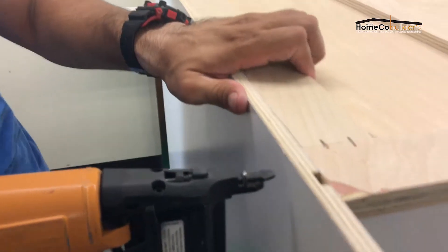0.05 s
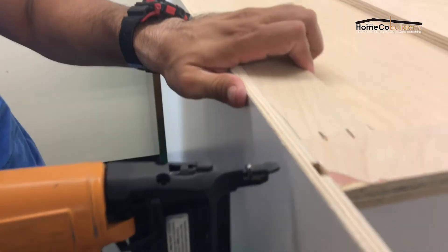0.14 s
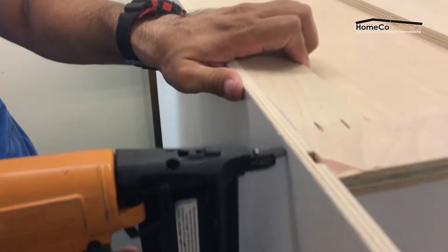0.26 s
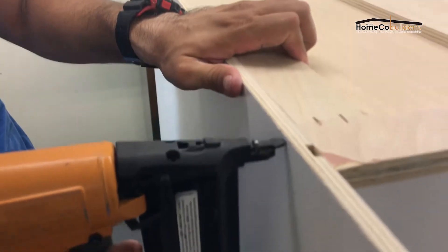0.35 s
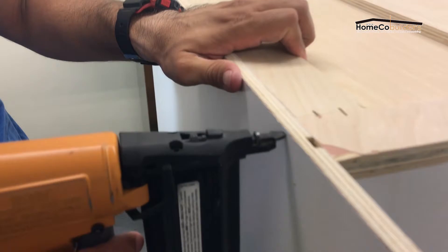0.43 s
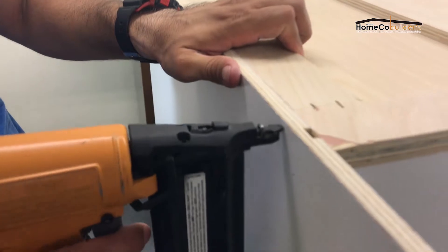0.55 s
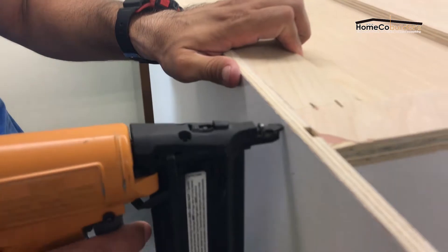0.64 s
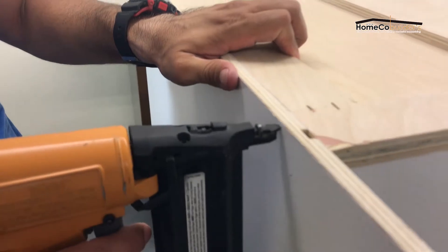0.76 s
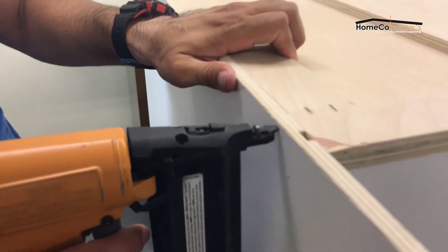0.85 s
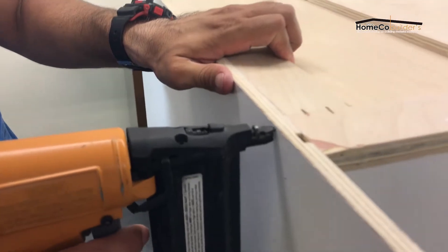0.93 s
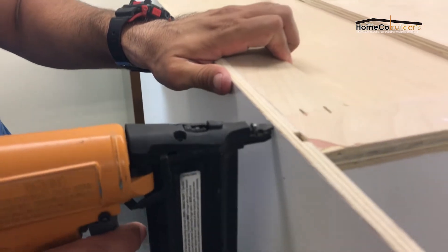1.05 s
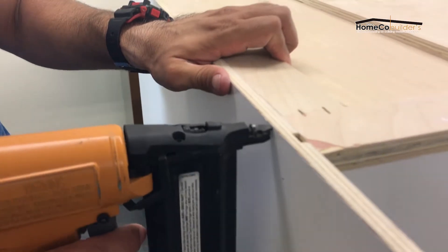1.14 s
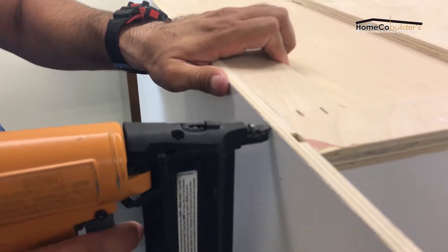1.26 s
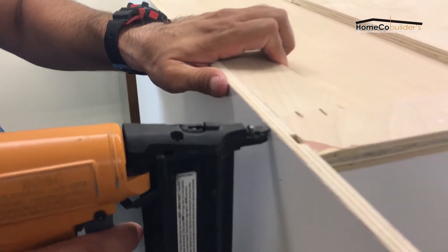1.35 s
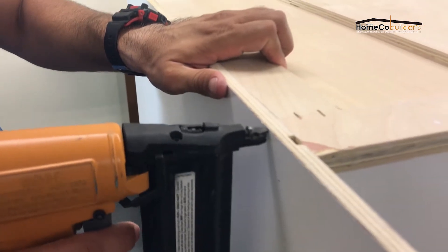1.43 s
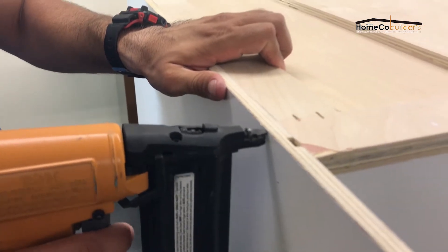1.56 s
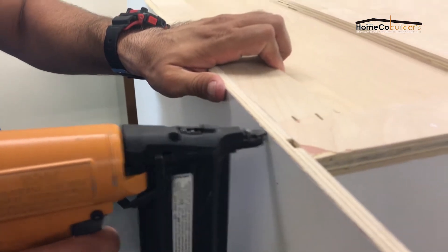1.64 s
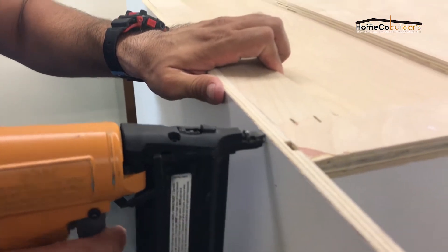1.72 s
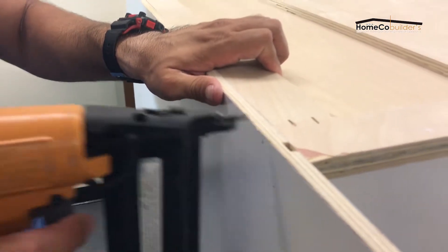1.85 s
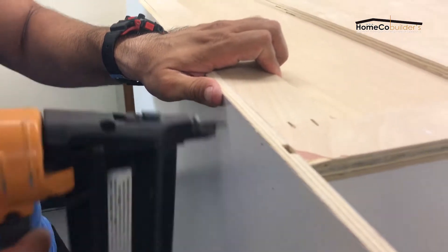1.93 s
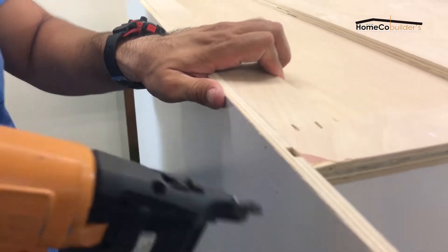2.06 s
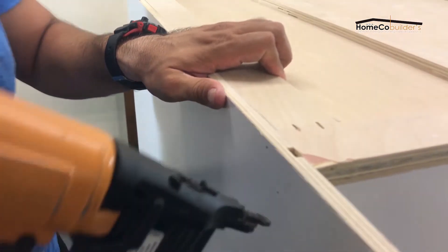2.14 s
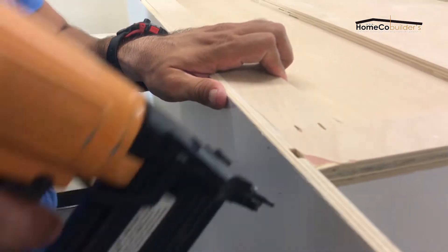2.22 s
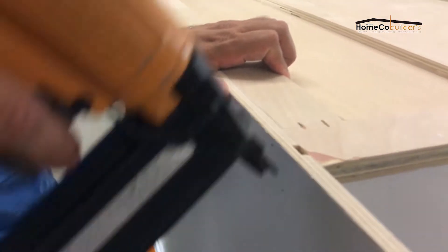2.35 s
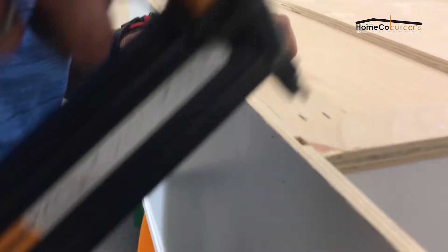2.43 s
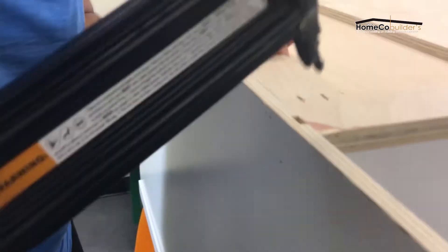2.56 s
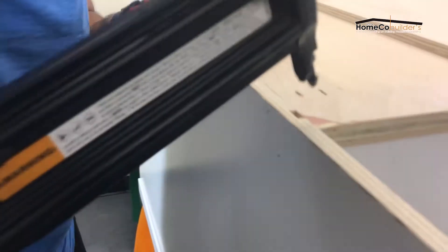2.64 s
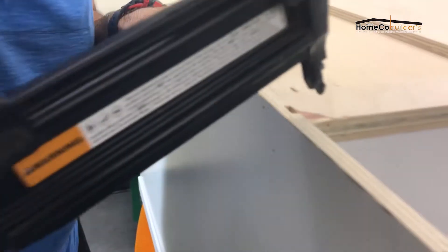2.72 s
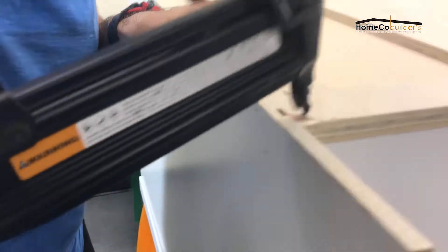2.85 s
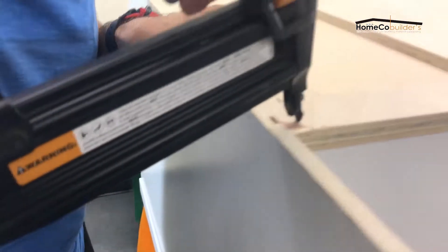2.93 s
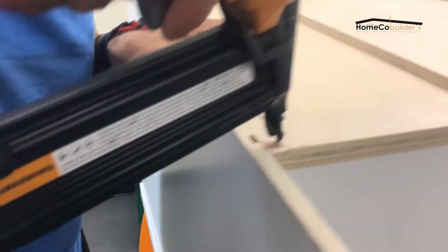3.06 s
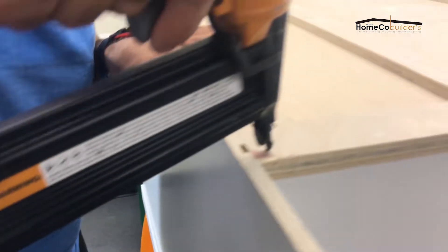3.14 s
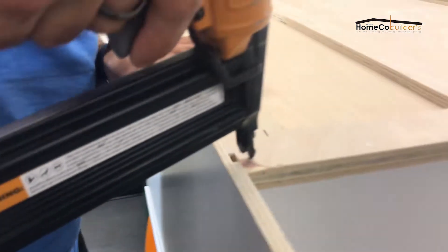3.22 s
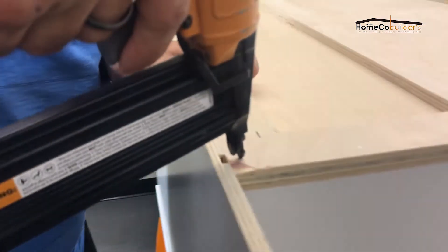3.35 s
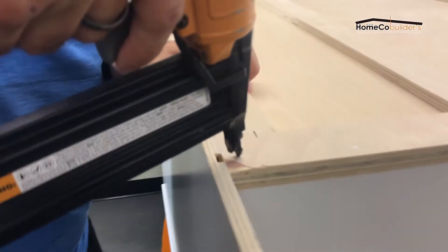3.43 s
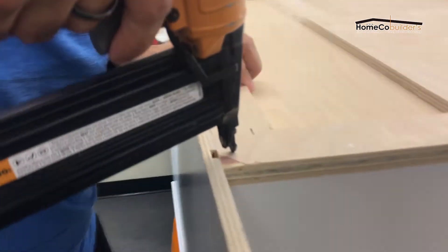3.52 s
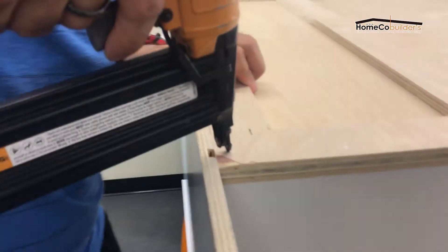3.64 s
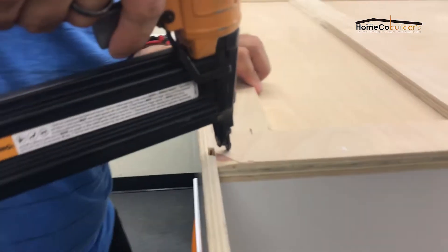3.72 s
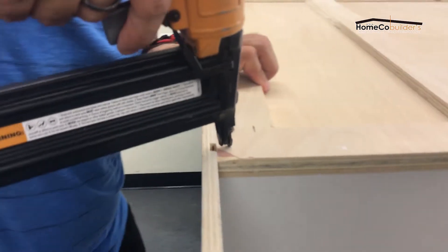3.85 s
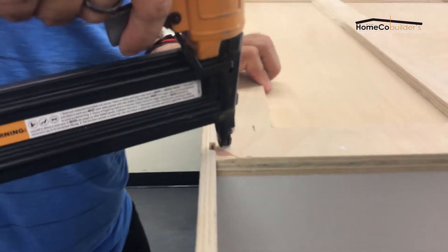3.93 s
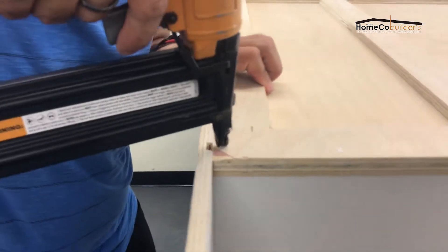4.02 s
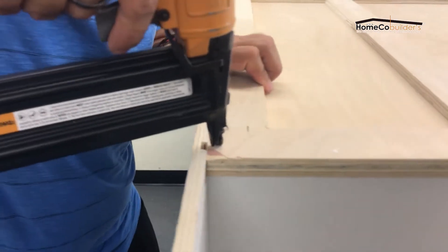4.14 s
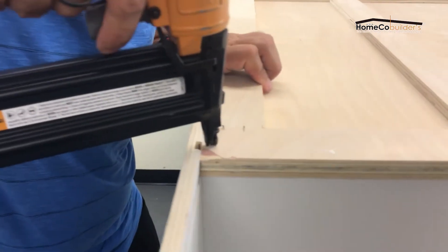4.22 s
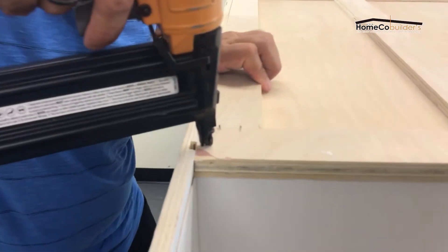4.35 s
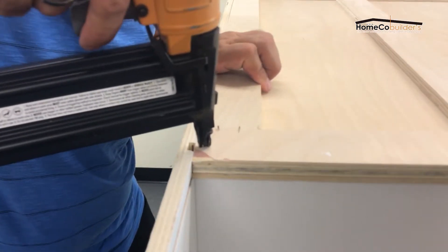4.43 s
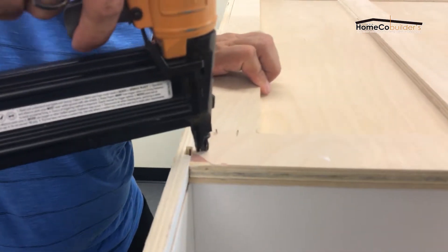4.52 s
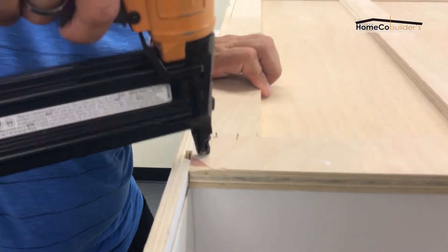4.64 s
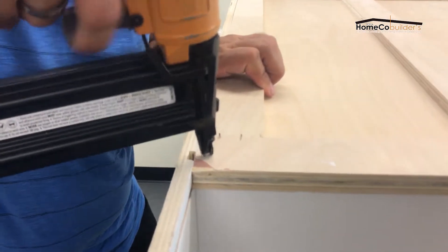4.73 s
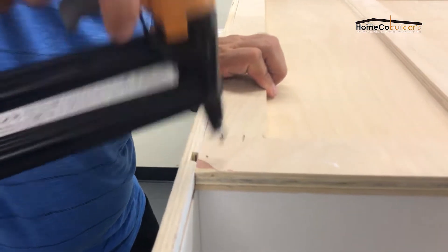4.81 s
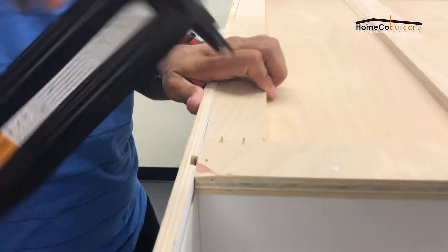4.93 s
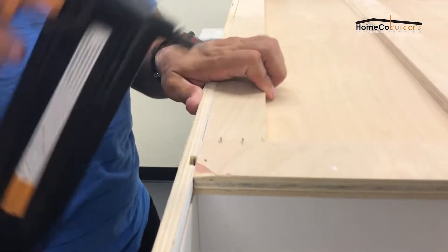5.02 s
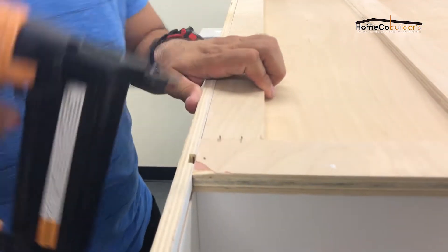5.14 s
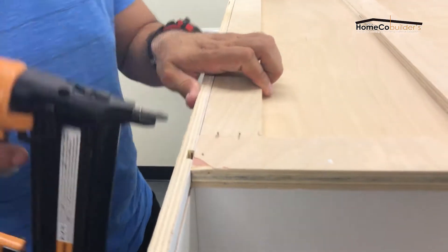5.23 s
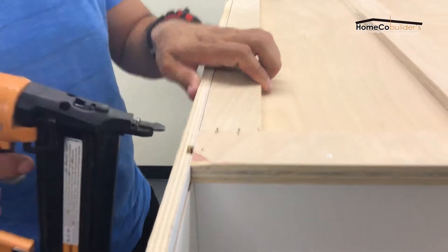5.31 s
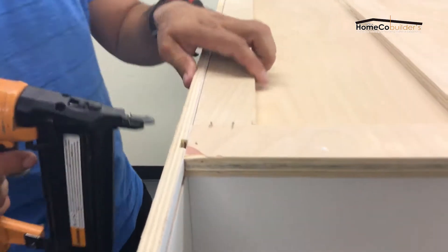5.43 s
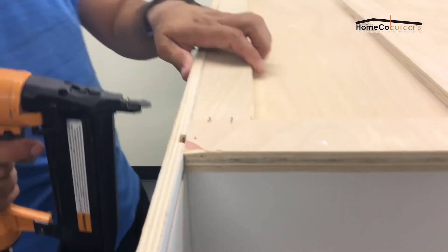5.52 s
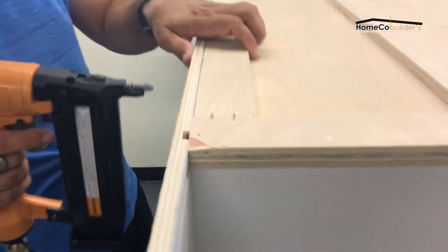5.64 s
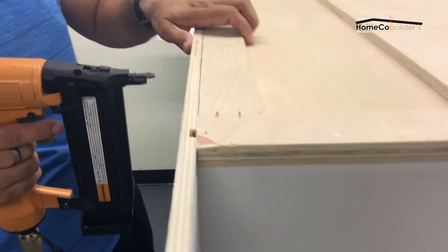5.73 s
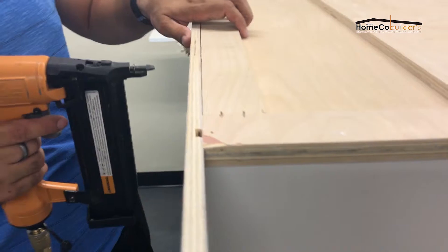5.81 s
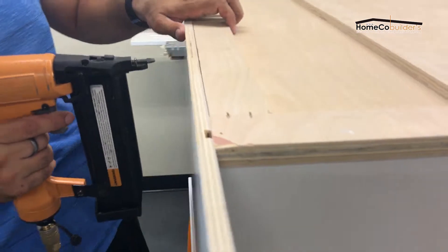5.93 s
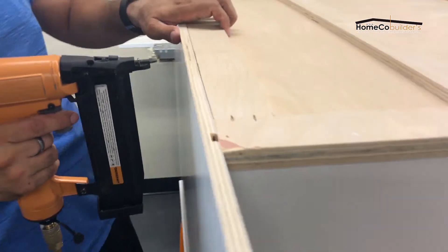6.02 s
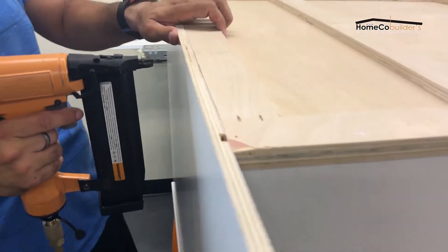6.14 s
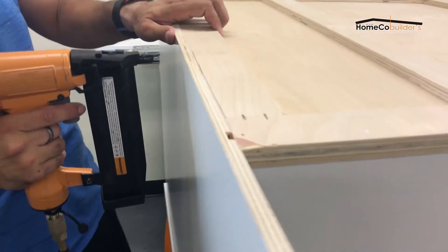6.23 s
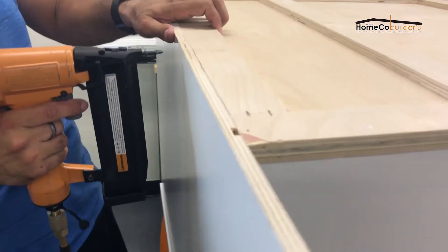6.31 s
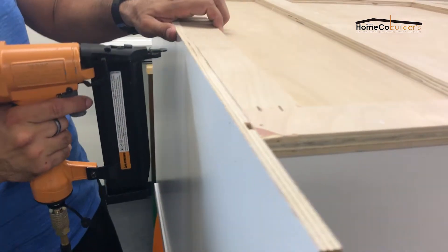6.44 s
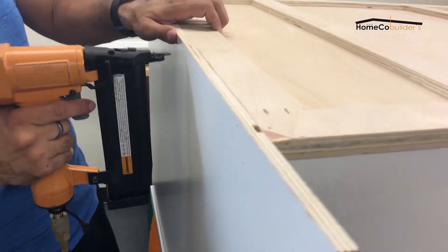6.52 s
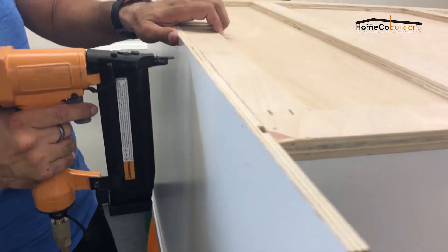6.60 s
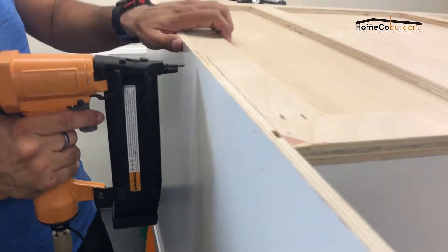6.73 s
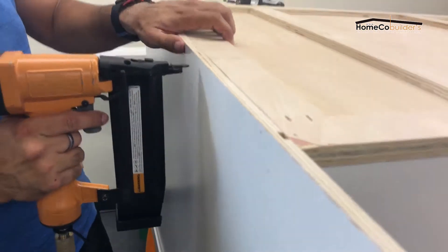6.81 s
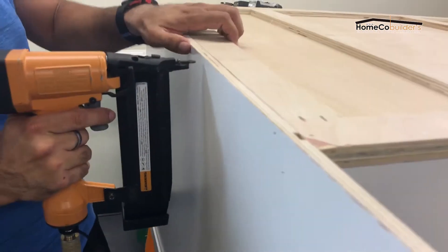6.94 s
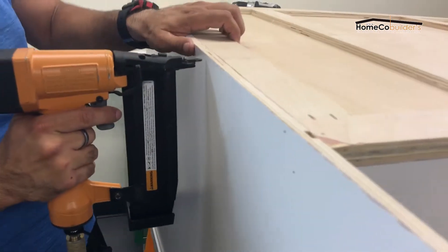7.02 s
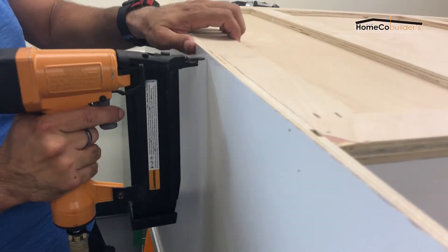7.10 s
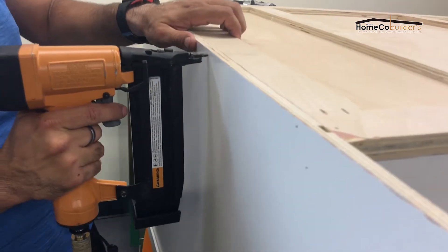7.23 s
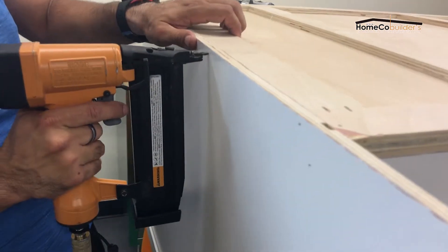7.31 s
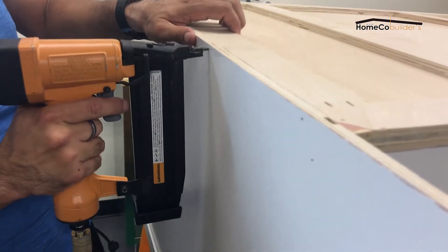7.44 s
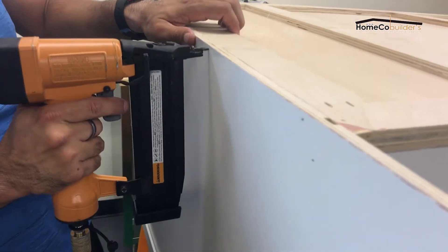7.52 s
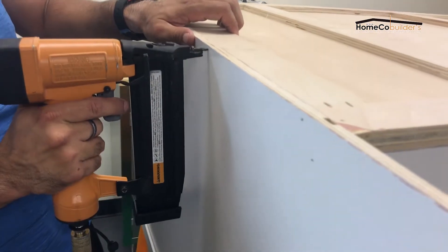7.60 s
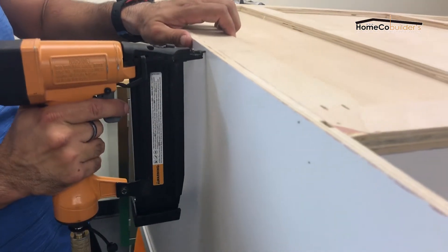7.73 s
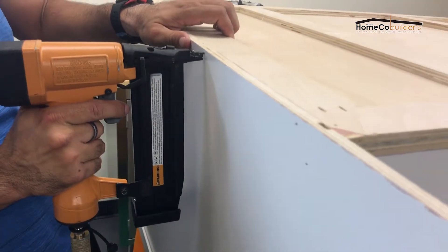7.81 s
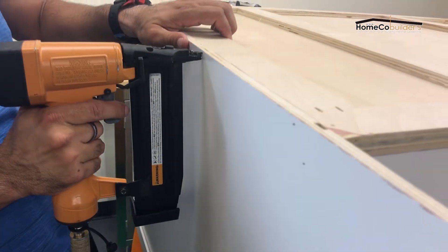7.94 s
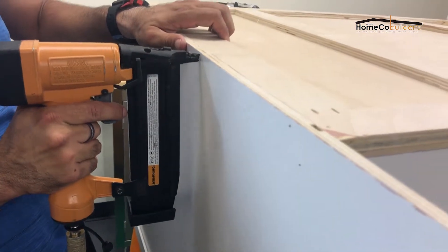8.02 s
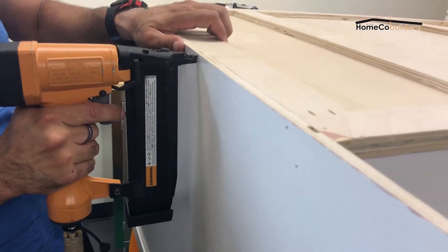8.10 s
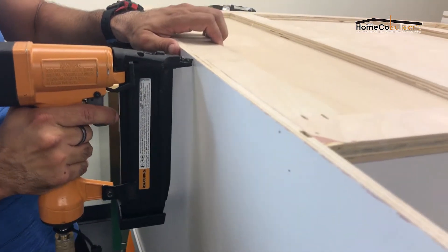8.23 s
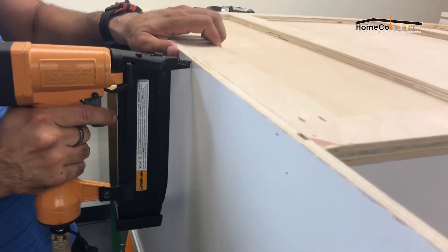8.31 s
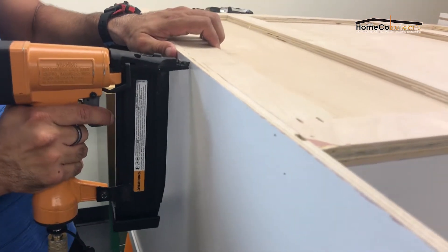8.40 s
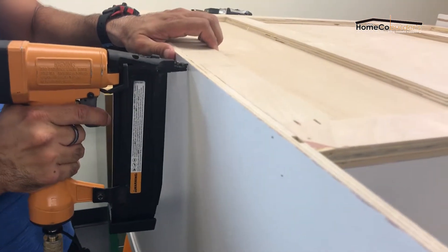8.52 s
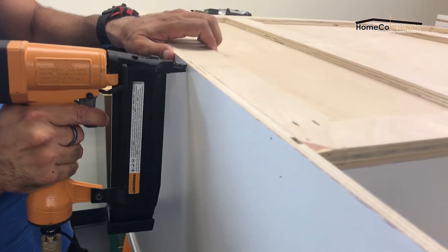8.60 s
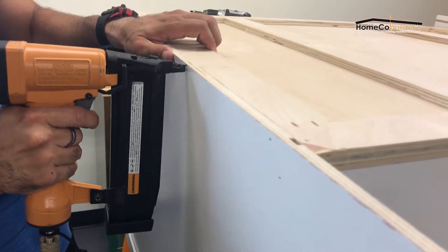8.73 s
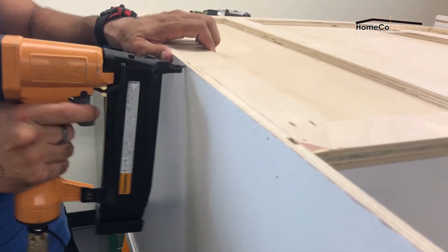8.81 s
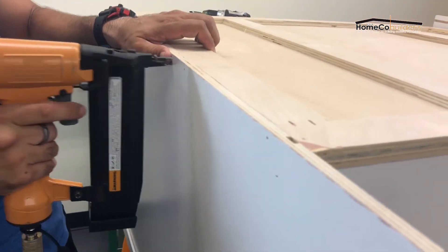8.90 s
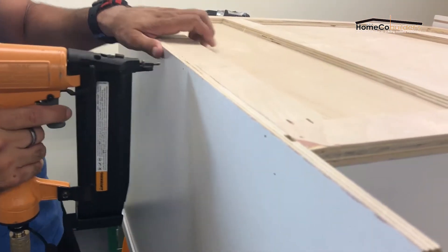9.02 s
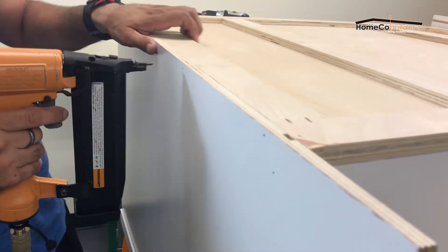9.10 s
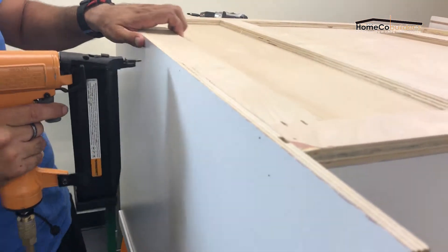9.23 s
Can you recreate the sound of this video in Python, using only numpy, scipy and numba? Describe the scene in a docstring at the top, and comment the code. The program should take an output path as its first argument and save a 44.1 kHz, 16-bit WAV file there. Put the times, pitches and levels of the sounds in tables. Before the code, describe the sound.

Three deafening pneumatic stapler shots slam into a plywood cabinet up close, each ending in an air blast, with small metal clicks and wood knocks between.

```python
"""A pneumatic stapler fires three times into a plywood cabinet, a hand's length from a phone in a workshop.
Each shot: valve tick, hiss of inlet air, driver blow (noise and modes), exhaust blast and gust.
Between shots: clicks of metal parts, knocks on wood (noise and modes), scrapes and hand strokes (shaped noise).
Beneath: coloured room noise, rumble and hum. The phone's gain sinks after each overload and climbs back."""
import sys
import numpy as np
from scipy import signal
from scipy.fft import rfft, irfft, next_fast_len
from scipy.io import wavfile
from numba import njit

SR = 44100
rng = np.random.default_rng(int(sys.argv[2]) if len(sys.argv) > 2 else 0)


def persist_wave(psi):
    """Save psi, clipped to +-1, as 16-bit WAV."""
    counts = np.round(np.clip(psi, -1, 1) * 32767).astype(np.int16)
    wavfile.write(sys.argv[1], SR, np.atleast_2d(counts).T)


N = 408366
T = np.arange(SR) / SR  # one second, the life of any single blow

# stapler shots: valve_s, inlet_db, land_s, blow_db (relative), thump_db, rattle_db, vent_s,
# exhaust_db, exhaust_length_s, gust_db
STAPLER_SHOTS = [(1.6640, 8, 1.681, 11.5, 8.5, -25, 1.7853, 20, 0.044, 22),
                 (4.6492, 5.5, 4.668, 13, 13.5, -20, 4.7770, 19.5, 0.038, 20.5),
                 (8.7168, 1.5, 8.736, 19, 3, 5.5, 8.8255, 21, .044, 19.5)]
# air through the inlet valve: freq_hz, level_db
INLET_COLOUR = [(100, -5.5), (500, -9), (900, -12), (2000, -9.5), (2600, -2.5), (4500, -1.5), (9000, -2.5),
                (15500, -2.5)]
# air out of the exhaust port: freq_hz, level_db
EXHAUST_COLOUR = [(100, 2.5), (280, -1.5), (450, 3), (620, 7), (850, -0.5), (1400, 1.5), (2500, 2),
                  (5000, -3.5), (10000, -4.5), (15500, -7.5)]
# splintering crack of the staple going in: freq_hz, level_db, t60_s
CRACK_BANDS = [(100, -2.5, 0.37), (405.3, 3, 0.24), (700, -1.5, 0.29), (1496, 6.5, 0.36), (2800, 1.5, 0.41),
               (5000, -2, 0.34), (9000, -9, 0.27), (15500, -6, 0.15)]
# ring of the stapler's body: freq_hz, level_db, t60_s (undamped)
BODY_MODES = [(674, -1, 0.29), (1213, -3, 0.27), (1305, -2.5, .33), (1400, -6, 0.26), (1670, -4.5, 0.25),
              (1843, 1, .35), (2050, -4.5, 0.19), (2377, -3.5, 0.62), (2405, -5.5, .3), (2520, -2.5, 0.24),
              (2573, -7, .3), (2840, -7, 0.25), (3340, -7, 0.34), (4540, -3.5, 0.42), (5130, -10, .25),
              (6500, -9.5, 0.26), (9630, -6.5, .22), (12503, -16, .2)]
# ring of the cabinet: freq_hz, level_db, t60_s (undamped)
CABINET_MODES = [(147, 0, 0.21), (215.4, -5.5, 0.74), (290, -5.5, .3), (376, -1, 0.23), (424.4, -1, 0.31),
                 (551, -0.5, 0.14), (590.5, -1.5, 0.44), (793.6, -8, 0.44), (882, -6.5, 0.39),
                 (1021, -4, .35), (1178, -1.5, .35), (2050, -8.5, .35)]
# small metal parts of nose and magazine: freq_hz, level_db, t60_s
LATCH_MODES = [(2480, 2, 0.046), (2810, 0.5, 0.054), (3700, -13, .012), (3990, 3.5, 0.022), (5130, -1, .03),
               (5750, 0, 0.024), (6100, -5, .025), (6850, -5.5, 0.039), (8830, -7, 0.012),
               (9500, -8.5, 0.06), (9580, -21.5, 0.084), (13080, -16, 0.069)]
# clicks of those parts: start_s, level_db (relative), pitch_hz, treble_db (relative)
PART_CLICKS = [(0.2923, -8.5, 2940, -9), (0.4024, -23, 4440, -47), (0.5069, -13, 4200, -15),
               (0.578, -12, 3880, -41), (0.965, -26.5, 2370, -26), (2.9056, -11, 4530, -13),
               (2.911, -8.5, 4330, -3), (2.957, -11.5, 6500, -5), (2.972, -9, 4440, -24),
               (2.978, -10, 2540, -30), (3.0435, -26, 2550, -15), (3.0634, -6.5, 2700, -19),
               (3.3529, -7.5, 2530, -27), (3.3747, -17.5, 4300, 0), (3.4535, -20, 2470, -31),
               (3.5297, -16, 4130, -39), (3.8151, -18, 2800, -31.5), (3.9622, -22, 2860, -25),
               (4.3993, -22.5, 2352, -21), (6.7514, -34, 3140, -20), (7.0971, -24, 2350, -38),
               (7.304, -19.5, 2570, -16), (7.3212, -23, 2520, -7), (7.3537, -28, 2490, -31),
               (7.7118, -19.5, 4100, -18), (8.1339, -28.5, 4400, -32), (8.542, -36, 2740, -30),
               (8.6617, -40, 2730, -14)]
# knocks on wood: start_s, level_db, low_edge_hz, high_edge_hz
WOOD_KNOCKS = [(.293, -32, 870, 3060), (.572, -27.5, 250, 3680), (.580, -23.5, 183, 3330),
               (.594, -21, 164, 1060), (.966, -41.5, 200, 2020), (2.904, -25, 636, 1850),
               (2.922, -25.5, 187, 1100), (3.375, -31.5, 237, 1330), (3.963, -33.5, 300, 1814),
               (3.975, -30, 130, 415), (5.238, -33, 281, 800), (7.098, -40.5, 1040, 3050),
               (7.260, -34, 400, 2360), (7.304, -24, 314, 2610), (7.8734, -28, 272, 2530),
               (9.062, -15, 300, 1600)]
# hiss of skin on plywood: freq_hz, level_db
SKIN_COLOUR = [(300, 9), (1500, 1.5), (3000, -2.5), (6000, -5), (10000, -10), (15500, -9)]
# workshop air noise: freq_hz, level_db
AIR_COLOUR = [(15, -49), (25, -23), (49, -0.5), (86, -7), (152, -4.5), (389, -19.5), (614, -23.5),
              (684, -23.5), (945, -22.5), (1710, -29), (1900, -34.5), (2230, -34.5), (4620, -44),
              (7700, -47.5), (15500, -51)]
# level of the low rumble and hum together: time_s, level_db
RUMBLE_LEVEL = [(0, -30), (0.3, -42.5), (1.0, -37.5), (1.4, -44), (2.85, -37), (3.6, -41.5), (4.5, -41.5),
                (5.6, -41), (6.8, -35.5), (7.5, -37.5), (7.85, -31), (8.3, -38)]
# machine hum: freq_hz, level_db (against the low air noise, before RUMBLE_LEVEL)
HUM_TONES = [(54, -43), (146, -49)]
# room reflections: freq_hz, level_db, t60_s
ROOM_BANDS = [(25, -22, .25), (60, -10.5, 0.2), (199.6, -7, .55), (552, 3.5, 0.52), (1300, 7, 0.48),
              (2380, 0.5, 0.49), (6006, 5, 0.48), (9830, 6, 0.39), (15500, 6.5, .36)]
# hand strokes along plywood and tool: start_s, start_level_db, hold_s
HAND_STROKES = [(3.27, -49, 0.26), (5.52, -40, .07), (5.61, -36.5, 0.32), (6.73, -52, 0.044),
                (6.91, -57.5, 0.079), (8.19, -59, 0.064)]
# tool scrapes, set down or lifted: start_s, level_db, hold_s
TOOL_SCRAPES = [(.58, -35, 0.065), (2.9, -47, 0.12), (3.36, -46, 0.036), (6.72, -59.5, 0.23)]
# slips of skin and plastic: freq_hz, level_db
SLIP_COLOUR = [(600, -14), (2400, 6.0), (4400, 0), (6500, -11), (15500, -30)]

AIR_DB = -36.5  # whole air noise, before its low part is levelled and its top softened
GRIP_DB, SLIPS_PER_S, SLIP_SPREAD_DB = -66.5, 500, 1.6  # steady rustle of the tool in the hand
SCRAPE_RISE_S, SCRAPE_END_S = .006, 0.05
# lower knocks ring longer and rasp less
KNOCK_HZ, KNOCK_T60_S, KNOCK_T60_SLOPE = 300, .3, .75
RASP_DB, RASP_DB_PER_OCTAVE = -29, 14
CONTACT_DB, CONTACT_T60_S = 3.5, 0.028  # first crack of a knock, against its ring
STROKE_RISE_S, STROKE_SAG_DB_PER_S, STROKE_LIFT_S = 0.0084, 29, 0.11
TOP_HZ = 15850


def undb(db):
    """Decibels to gain."""
    return 10 ** (np.asarray(db) / 20)


def unit(x, size=None):
    """Scale so that the first `size` samples have rms 1."""
    return x / np.sqrt(np.mean(x[:size] ** 2))


def add(track, start_s, x):
    """Mix x into the track from start_s on."""
    i = int(start_s * SR)
    track[i:i + len(x)] += x[:len(track) - i]


def curve(rows):
    """Join (time_s, value) rows by straight lines."""
    return np.interp(np.arange(N) / SR, *np.transpose(rows))


def white(size=SR):
    """White noise, one second unless told otherwise."""
    return rng.standard_normal(size)


def noise(points, size=SR):
    """Noise of rms 1 with a (freq_hz, level_db) colour."""
    hz, db = np.transpose(points)
    n = next_fast_len(size)
    bin_hz = np.arange(n // 2 + 1) * SR / n
    gain = undb(np.interp(np.log(bin_hz + 1), np.log(hz), db))
    return unit(irfft(rfft(white(n)) * gain, n)[:size])


def band(x, low_hz, high_hz, order=2):
    """Band-pass; the high edge is kept at least an octave above the low one."""
    edges_hz = [low_hz, np.clip(high_hz, 2 * low_hz, SR / 2 - 1)]
    return signal.sosfilt(signal.butter(order, edges_hz, "band", fs=SR, output="sos"), x)


def fade(t60_s):
    """Exponential decay by 60 dB in t60_s."""
    return np.exp(-np.log(1000) * T / t60_s)


def dying_noise(rows):
    """Countless close modes: overlapping noise bands, each with its own level and decay."""
    hz, db, t60_s = np.transpose(rows)
    spectrum = rfft(white())
    log_hz = np.log(np.arange(len(spectrum)) + 1)
    shares = [np.interp(log_hz, np.log(hz), row) for row in np.eye(len(hz))]
    return sum(irfft(spectrum * share, len(T)) * undb(d) * fade(t)
               for share, d, t in zip(shares, db, t60_s))


def ring(modes, scatter=0.0065, damping=1):
    """Struck modes: decaying sines, with a small random spread of pitch and a random phase."""
    chance = rng.standard_normal((len(modes), 2))
    return sum(undb(db) * fade(t60_s / damping) * np.sin(2 * np.pi * (hz * (1 + scatter * a) * T + b))
               for (hz, db, t60_s), (a, b) in zip(modes, chance))


def valve(rise_s, open_s, close_s):
    """Rise, hold and release, like air flow through a valve that opens, stays open and runs out."""
    return (1 - np.exp(-T / rise_s)) * np.exp(-np.maximum(T - open_s, 0) / close_s)


def thump(start_hz, end_hz, glide_s, peak_s):
    """A few heavy swings that swell, slow down and die."""
    hz = end_hz + (start_hz - end_hz) * np.exp(-T / glide_s)
    swell = (T / peak_s * np.exp(1 - T / peak_s)) ** 2
    return np.sin(2 * np.pi * np.cumsum(hz) / SR) * swell


def background():
    """Steady ventilation noise, a rumble that swells under it and a wavering machine hum."""
    air = undb(AIR_DB) * noise(AIR_COLOUR, N)
    low = signal.sosfiltfilt(signal.butter(2, 230, fs=SR, output="sos"), air)
    hiss = signal.sosfilt(signal.butter(1, 6000, fs=SR, output="sos"), air - low)
    hum = np.zeros(N)
    for hz, db in HUM_TONES:
        waver = unit(band(white(N), 1, 3))
        hum += undb(db) * waver * np.sqrt(2) * np.sin(2 * np.pi * hz * np.arange(N) / SR)
    return hiss + unit(low + hum) * undb(curve(RUMBLE_LEVEL))


def rubbing(rows, rise_s, end_s, sag_db_per_s=0):
    """Strength of rubbing movements: each rises, may sag as it goes on, and dies away."""
    out = np.zeros(N)
    for start_s, db, hold_s in rows:
        add(out, start_s, undb(db - sag_db_per_s * T) * valve(rise_s, hold_s, end_s))
    return out


def grip():
    """Tiny slips of skin and plastic: a dense patter of faint ticks that swells when the tool scrapes."""
    strength = undb(SLIP_SPREAD_DB * rng.exponential(size=N))
    slips = (rng.random(N) < SLIPS_PER_S / SR) * white(N) * strength
    slip = noise(SLIP_COLOUR) * fade(0.0099)
    patter = unit(signal.fftconvolve(slips, slip)[:N])
    return patter * (undb(GRIP_DB) + rubbing(TOOL_SCRAPES, SCRAPE_RISE_S, SCRAPE_END_S))


def clicks():
    """Loose steel parts tap each other and settle with a small bounce; harder contacts are brighter."""
    out = np.zeros(N)
    for start_s, db, pitch_hz, treble_db in PART_CLICKS:
        contact = noise([(700, -17.5), (1700, -20), (2500, -1.5), (4500, 2.0),
                         (9000, .5 * treble_db), (11500, treble_db + 7), (15500, treble_db)])
        bounce_s = rng.uniform(0.00084, 0.0043)
        bounce = undb(-11) * np.roll(fade(0.0043), int(bounce_s * SR))
        part = undb(-3.0) * ring([(pitch_hz, 0, .008)]) + undb(-20.5) * ring(LATCH_MODES, scatter=0.015)
        tick = contact * (fade(0.0027) + bounce + undb(-31) * fade(0.14)) + part
        add(out, start_s + 0.00074, undb(db - 11.0) * unit(tick, size=100))
    return out


def knocks():
    """Blunt contacts ring the plywood box; a softer one leaves out the highs, and the fibres rasp faintly."""
    out = np.zeros(N)
    for start_s, db, low_hz, high_hz in WOOD_KNOCKS:
        t60_s = KNOCK_T60_S * (KNOCK_HZ / low_hz) ** KNOCK_T60_SLOPE
        rasp_db = RASP_DB + RASP_DB_PER_OCTAVE * np.log2(low_hz / KNOCK_HZ)
        grain = white() * (fade(t60_s) + undb(CONTACT_DB) * fade(CONTACT_T60_S))
        wood = grain + undb(-15.5) * ring(CABINET_MODES, scatter=.004, damping=0.39 / t60_s)
        body = unit(band(wood, low_hz, high_hz, order=6), size=800)
        rasp = undb(rasp_db) * unit(grain, size=800)
        add(out, start_s, undb(db) * (body + rasp))
    return out


def shots():
    """Air drives the piston down, the staple slams in, the cylinder vents and the piston flies back."""
    out = np.zeros(N)
    for (valve_s, inlet_db, land_s, blow_db, thump_db, rattle_db,
         vent_s, exhaust_db, exhaust_length_s, gust_db) in STAPLER_SHOTS:
        # the trigger lets air seep, then the head valve ticks and pops open
        add(out, valve_s - .022, undb(-44) * noise(INLET_COLOUR) * fade(.3))
        tick = unit(band(white(), 500, 3000, order=1)) * fade(0.0084)
        add(out, valve_s - .0042, undb(-17.5) * tick)
        add(out, valve_s - .0005, undb(inlet_db) * noise(INLET_COLOUR) * valve(0.0019, .014, 0.0021))

        blow = unit(dying_noise(CRACK_BANDS), size=1000)
        blow += undb(-9) * unit(ring(BODY_MODES, scatter=0.0045), size=1000)
        blow += undb(-12.5) * unit(ring(CABINET_MODES), size=1000)
        add(out, land_s, undb(blow_db - 2.5) * blow * (1 - np.exp(-T / 0.0029)))

        # the panel swings as a whole, then rattles against the carcass
        swing = thump(160, 56, .0055, .013) + undb(-3) * thump(360, 128, .004, 0.0048)
        add(out, land_s, undb(thump_db) * swing)
        rattle = unit(band(white(), 40, 710, order=1)) * valve(.02, 0.046, 0.043)
        add(out, land_s, undb(rattle_db) * rattle)

        exhaust = noise(EXHAUST_COLOUR) * valve(0.002, exhaust_length_s, 0.014)
        add(out, vent_s, undb(exhaust_db) * exhaust)
        piston_return = unit(ring(BODY_MODES, scatter=0.0026, damping=2.5), size=1000)
        add(out, vent_s + .008, undb(exhaust_db - 14) * piston_return)

        # the puff of spent air reaches the microphone later than its sound
        eddies = unit(band(white(), 92, 850)) * valve(0.0023, 0.023, 0.0032)
        gust = thump(423, 52, 0.011, .011) + undb(-1.5) * eddies
        add(out, vent_s + exhaust_length_s - .011, undb(gust_db) * gust)
    return out


def palm():
    """Skin hisses over the plywood: each stroke starts briskly, slows down and lifts off."""
    strokes = rubbing(HAND_STROKES, STROKE_RISE_S, STROKE_LIFT_S, STROKE_SAG_DB_PER_S)
    return noise(SKIN_COLOUR, N) * strokes


def reverb(x):
    """Diffuse reflections of the workshop, building up over the first hundredths of a second."""
    tail = dying_noise(ROOM_BANDS) * (1 - np.exp(-T / 0.012))
    return signal.fftconvolve(x, tail / np.sqrt(np.sum(tail ** 2)))[:N]


def scene():
    """Tool, cabinet and hands close by, in the room."""
    bangs, ticks, wood = shots(), clicks() + grip(), knocks()
    room = reverb(undb(-12) * bangs + undb(-15) * ticks + undb(-7.5) * wood)
    return (bangs + ticks + wood + palm() + room + background())[None]


@njit
def auto_gain(x, top_rms, sense_s, attack_s, hold_s, jump_per_s, jump_s, recover_per_s):
    """Gain sinks while the sound is too loud, waits, then climbs: quickly at first, then steadily."""
    out, power, gain, wait_s = np.empty(len(x)), 0., 1., 0.
    for i in range(len(x)):
        power += (x[i] ** 2 - power) / (sense_s * SR)
        over = np.sqrt(power) * gain / top_rms
        wait_s -= 1 / SR
        if over > 1:
            gain, wait_s = gain * over ** (-1 / (attack_s * SR)), hold_s
        elif wait_s < 0:
            gain = min(1., gain + (recover_per_s + jump_per_s * np.exp(wait_s / jump_s)) / SR)
        out[i] = gain
    return out


def record(dry):
    """The phone turns its gain down too late, so the shots clip; its preamplifier hisses, the top is cut."""
    # top_rms, sense_s, attack_s, hold_s, jump_per_s, jump_s, recover_per_s
    gain = auto_gain(dry[0], 0.72, .003, 0.012, 0.16, 2.4, 0.028, 0.85)
    x = np.clip(dry[0] * gain + undb(-63.5) * white(N), -1, 1)
    return signal.sosfilt(signal.ellip(10, .1, 70, TOP_HZ, fs=SR, output="sos"), x)[None]


dry = scene()
out = record(dry)
persist_wave(out)
```